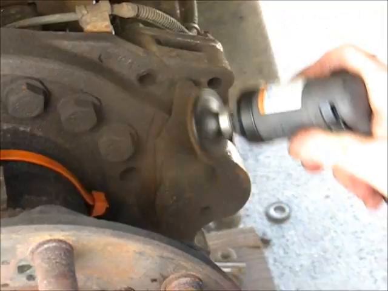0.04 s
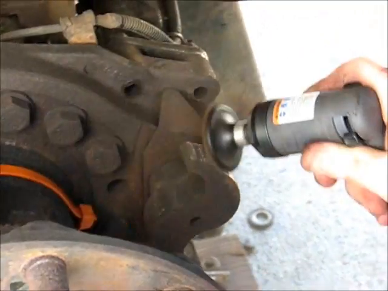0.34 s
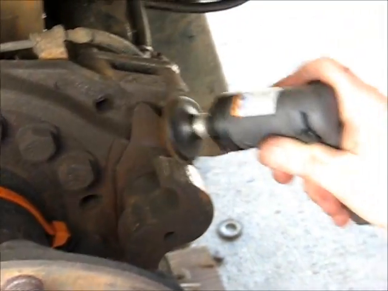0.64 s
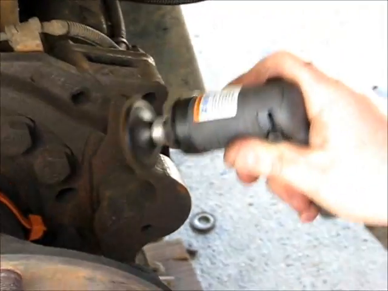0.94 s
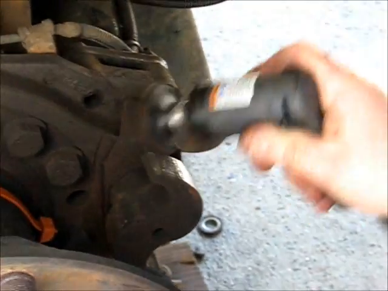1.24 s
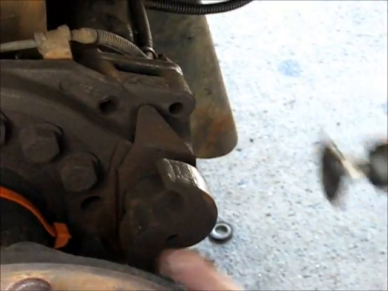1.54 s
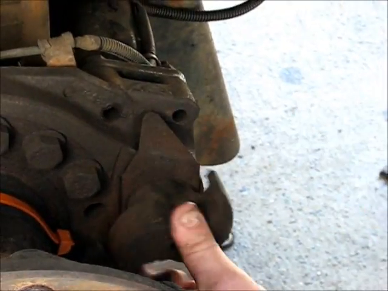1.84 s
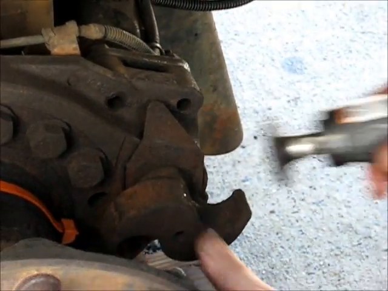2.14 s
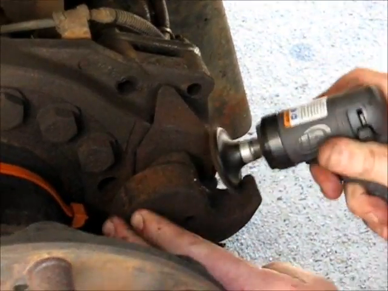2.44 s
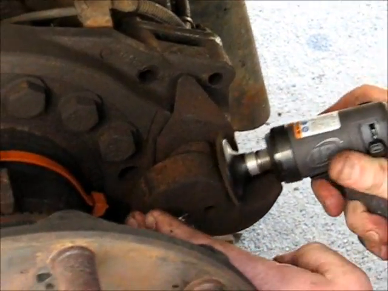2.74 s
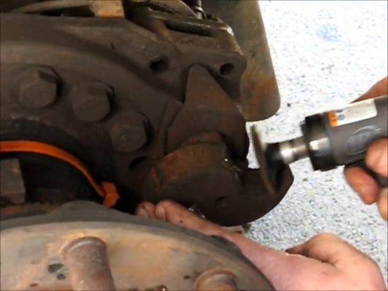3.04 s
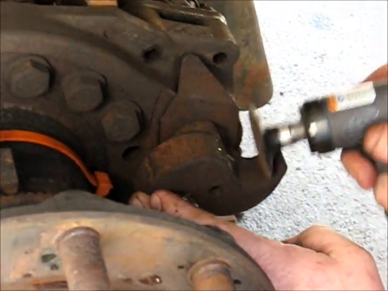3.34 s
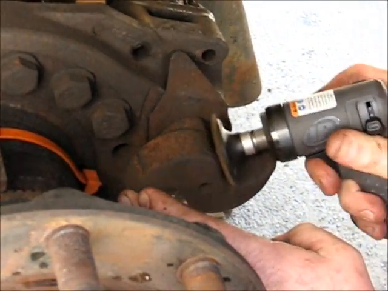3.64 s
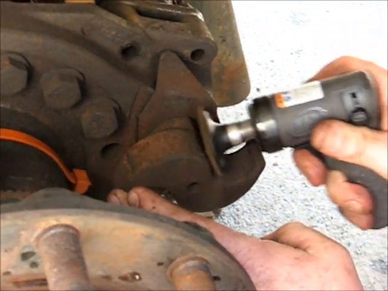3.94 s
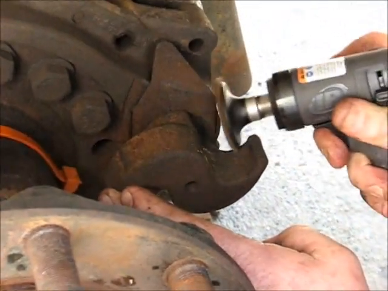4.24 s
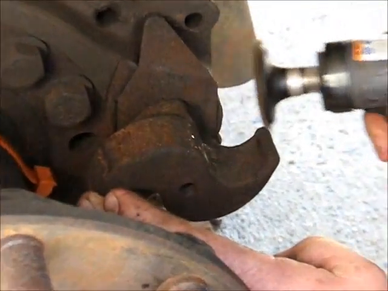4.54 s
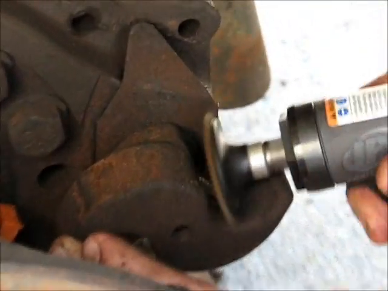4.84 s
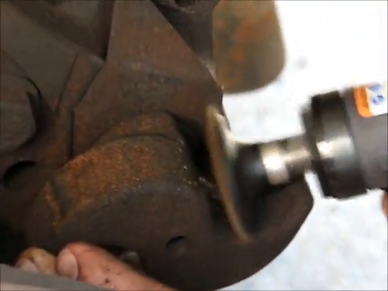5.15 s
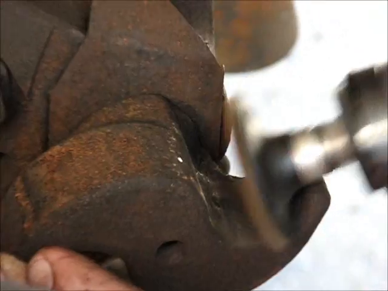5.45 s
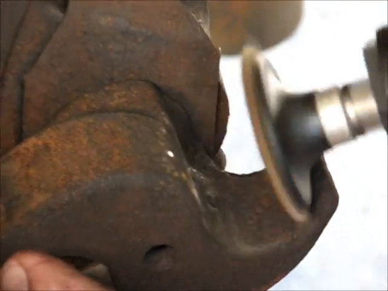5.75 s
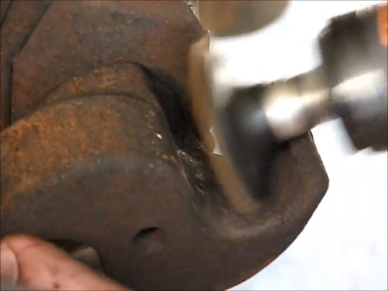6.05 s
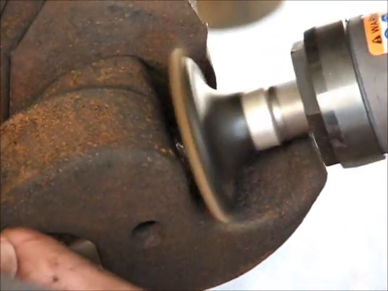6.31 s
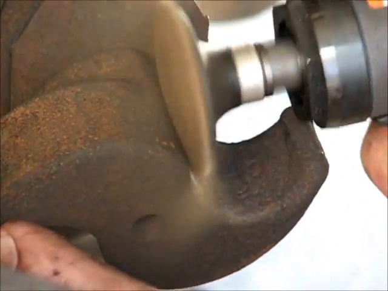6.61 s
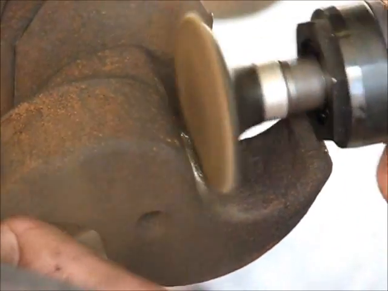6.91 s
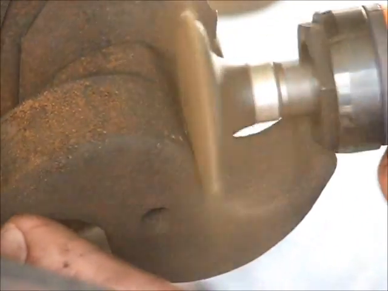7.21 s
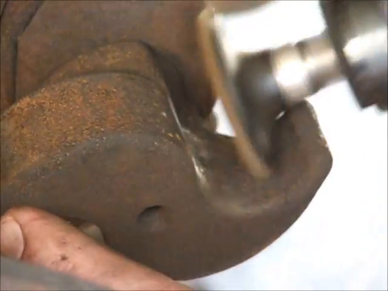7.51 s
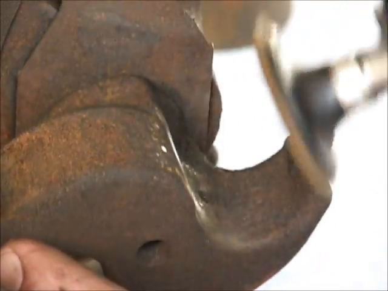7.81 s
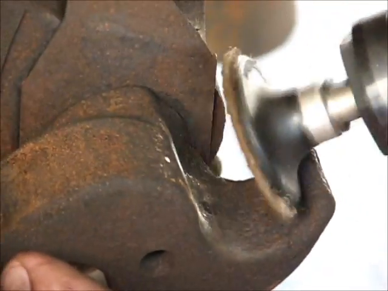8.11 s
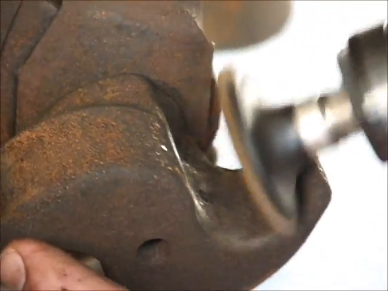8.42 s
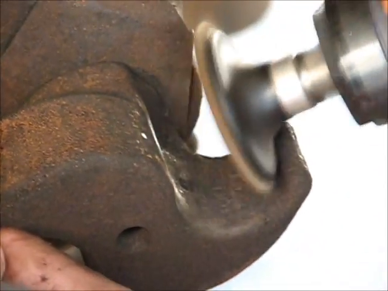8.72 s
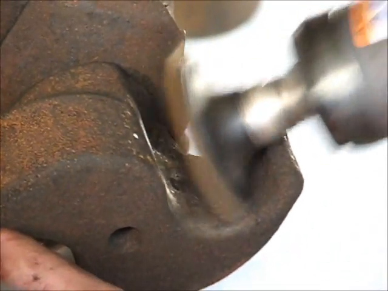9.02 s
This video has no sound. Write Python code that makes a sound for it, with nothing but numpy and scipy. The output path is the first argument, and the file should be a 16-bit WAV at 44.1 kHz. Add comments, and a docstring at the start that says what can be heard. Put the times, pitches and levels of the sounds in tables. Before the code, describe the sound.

A small air grinder is already running close to the microphone, its bright exhaust hiss over the scratchy buzz of an abrasive disc on rusty iron. At about 1.2 seconds it cuts out. In the quiet workshop pause come two soft clinking bumps, around 1.4 and 1.7 seconds, then a faint dry scrape and squeak as an iron part turns. A low puff of air hits the microphone, mostly on the right, and at 2.3 seconds the grinder spins up, biting an edge with loud chatter. It scrubs on in uneven strokes, the motor's hum dropping under pressure, with short knocks near 3, 4.2 and 5 seconds. A faint squeal comes around 4.5 seconds, and a breathy squeal with a brief whine around 7. After a sharp catch at 7.6 seconds the air sags briefly, then grinding continues until about 9 seconds.

```python
"""A small air grinder scrubs rust from an iron brake part, rests for a second, and starts again.
Exhaust air hisses and rings in the housing; the abrasive disc scratches and buzzes with each turn;
the vanes hum lower under load. During the rest a thumb pushes a dry iron cam round.
Nearby iron faces throw back shifting echoes; the exhaust buffets the right microphone port."""
import sys
import numpy as np
from scipy import signal
from scipy.fft import rfft, irfft, next_fast_len
from scipy.io import wavfile
from scipy.ndimage import uniform_filter1d, map_coordinates

SR = 44100
rng = np.random.default_rng(int(sys.argv[2]) if len(sys.argv) > 2 else 0)


def wav_out(sig):
    """Save sig, one row per channel (or a flat mono array), as 16-bit PCM at SR to the path in sys.argv[1]."""
    wavfile.write(sys.argv[1], SR, np.round(np.clip(np.atleast_2d(sig).T, -1, 1) * 32767).astype(np.int16))


N = 399987
TIME_S = np.arange(N) / SR

def amp(db):
    """Decibels to gain."""
    return 10 ** (np.asarray(db) / 20)

def unit(x):
    """Scale to rms 1."""
    return x / np.sqrt(np.mean(x ** 2) + 1e-20)

def along(points, hz):
    """Interpolate (Hz, value) points on a log axis."""
    f, v = np.transpose(points)
    return np.interp(np.log(hz + 1), np.log(f + 1), v)

def curves(rows, outside=None):
    """One value per sample for each column after the time."""
    s, *cols = np.transpose(rows)
    return np.array([np.interp(TIME_S, s, c, outside, outside) for c in cols])

def swells(rows):
    """Sum of bells from (middle s, length s at half height, height) rows."""
    t = np.linspace(0, N / SR, N // 64)
    bells = sum(height * np.exp2(-(2 * (t - s) / length) ** 2) for s, length, height in rows)
    return curves(np.transpose([t, bells]))[0]

def surges(rows):
    """Bells with heights in dB, as a gain."""
    return swells([(s, length, amp(db)) for s, length, db in rows])

def blows(rows, attack_s=0.00024):
    """Envelope of sharp blows from (start s, level dB, t60 s) rows."""
    t = np.arange(SR // 4) / SR
    envelope = np.zeros(N + SR)
    for s, db, t60 in rows:
        envelope[round(s * SR):][:len(t)] += (1 - np.exp(-t / attack_s)) * amp(db - 60 * t / t60)
    return envelope[:N]

def wobble(rate_hz):
    """Smooth random curve."""
    return map_coordinates(rng.standard_normal(int(N * rate_hz / SR) + 4), [TIME_S * rate_hz])

def noise():
    """Two unrelated white noises."""
    return rng.standard_normal((2, N))

def patchy(depth_db=2):
    """Noise whose colour drifts in patches."""
    spectra = signal.stft(noise(), nperseg=512)[2]
    field = uniform_filter1d(rng.standard_normal(spectra.shape[1:]), size=4, axis=0)
    field = uniform_filter1d(field, size=20, axis=1)
    return signal.istft(spectra * amp(depth_db * unit(field)), nperseg=512)[1][:, :N]

def breathy_tone(hz, width_hz):
    """Narrow noise at rms 1 around a steady or moving pitch."""
    phase = 2 * np.pi * np.cumsum(hz * np.ones(N)) / SR
    return unit(wobble(2 * width_hz) * np.cos(phase) + wobble(2 * width_hz) * np.sin(phase))

def filtered(x, response):
    """Apply a complex frequency response."""
    size = next_fast_len(N + SR // 4)
    return irfft(rfft(x, size) * response(np.fft.rfftfreq(size, 1 / SR)), size)[..., :N]

def coloured(x, spectrum):
    """Shape x by (Hz, dB) points, at rms 1."""
    return unit(filtered(x, lambda hz: amp(along(spectrum, hz))))

def resonate(x, modes):
    """Parallel (Hz, width Hz, dB) resonances of alternating sign."""
    return filtered(x, lambda f: sum(
        (-1) ** k * amp(db) * 1j * f * width / (hz * hz - f * f + 1j * f * width)
        for k, (hz, width, db) in enumerate(modes)))

def centred(x):
    """Mono as a mid/side pair."""
    return np.outer([1, 0], x)

# Background level. Each row: time in seconds, level in dB.
ROOM_LEVEL = [(1.3, -60.5), (1.6, -57.5), (1.95, -52), (2.32, -47)]
# Background spectrum. Each row: frequency in Hz, density in dB.
ROOM_SPECTRUM = [(100, 4.5), (500, 2.5), (900, 2), (1500, -2.5), (3000, -8), (6000, -9.5), (8300, -12),
                 (11000, -19), (15000, -28)]

def workshop(whistle_db=-19):
    """Soft background rush, and a thin whistle of air at the closed throttle."""
    level, = amp(curves(ROOM_LEVEL))
    resting, = amp(curves([(1.2, 0), (2.45, 0.0091)], outside=-np.inf))
    whistle = amp(whistle_db) * unit(resonate(noise(), [(8200, 50, 0)]))
    rush = coloured(noise(), ROOM_SPECTRUM)
    return level * (resting * whistle + (0.29 + resting) * rush)

# Stray air. Each row: middle in seconds, length in seconds, level in dB.
AIR_GUSTS = [(.27, .11, -43.5), (.95, .7, -45.5), (1.8, .65, -41.5), (2.24, .066, -29), (2.39, .088, -41.5),
             (2.86, .14, -47), (3.75, .55, -51), (6.03, .17, -56)]
# Wind rumble. Each row: frequency in Hz, density in dB.
WIND_SPECTRUM = [(15, -41), (25, -22), (54, -3), (135, -0.5), (289, -13.5), (403, -23), (498, -23),
                 (600, -28), (780, -39), (1320, -120)]

def draught(lumps_db=3, left_db=-11, right_db=3.5, still_db=-64):
    """Stray exhaust tumbles over the microphone ports, mostly the right one."""
    lumps = amp(lumps_db * wobble(40))
    level = surges(AIR_GUSTS) + amp(still_db + 3.3 * wobble(14))
    return level * amp([[left_db], [right_db]]) * coloured(noise() * lumps, WIND_SPECTRUM)

# Low modes of the casting. Each row: frequency in Hz, width in Hz, gain in dB.
CASTING_MODES = [(130, 140, -6.5), (294, 29, 10), (636, 100, 1.5)]

def casting(force):
    """The heavy casting booms when shaken."""
    return unit(resonate(force, CASTING_MODES))

# Hand bumps. Each row: start in seconds, clink in dB, thud in dB.
BUMPS = [(1.417, -55, -44), (1.710, -44, -47)]
# Thumb pushes. Each row: middle in seconds, length in seconds, level in dB.
CAM_PUSHES = [(1.785, 0.089, -45.5), (1.93, 0.087, -52.5), (2.135, 0.018, -51)]
# Modes of the clink and of the cam's scrape. Each row: frequency in Hz, width in Hz, gain in dB.
CLINK_MODES = [(3000, 400, 1), (4000, 250, 0), (4900, 170, 1), (7510, 140, -3), (9880, 180, -12)]
SCRAPE_MODES = [(3160, 370, -5.5), (5040, 500, -7), (6260, 130, 0), (6870, 120, -1), (7800, 200, -1),
                (9800, 100, -3), (10550, 120, -4), (11900, 220, -7)]
# Partials of the sticking cam. Each row: frequency in Hz, level in dB.
SQUEAK_PARTIALS = [(3080, -13), (4360, -9), (4950, -7), (6190, -1), (7410, -8), (9750, -9), (11800, -13)]

def handling(scrape_db=-1, grit_db=3, clink_t60_s=0.096, thud_t60_s=0.055):
    """The hand bumps the brake with a clink and a thud; the cam scrapes on its dry pin and squeaks."""
    clink = blows([(s, db, clink_t60_s) for s, db, _ in BUMPS]) * unit(resonate(noise(), CLINK_MODES))
    thump = blows([(s, db, thud_t60_s) for s, _, db in BUMPS]) * casting(noise())
    friction = noise() * amp(grit_db * wobble(1000))
    scrape = amp(scrape_db) * surges(CAM_PUSHES) * unit(resonate(friction, SCRAPE_MODES))
    partials = sum(amp(db) * breathy_tone(hz, width_hz=30) for hz, db in SQUEAK_PARTIALS)
    squeak = surges([(1.945, 0.086, -57)]) * partials
    return clink + thump + scrape + centred(squeak)

# Disc contacts. Each row: start in seconds, chatter in dB, thud in dB, chatter t60 in seconds.
CONTACTS = [(1.267, -32.5, -66, 0.04), (2.29, -38, -47, 0.071), (2.387, -19, -54, 0.078),
            (2.426, -19, -58, .05), (2.455, -13, -60, 0.069), (2.945, -28, -41, .08),
            (4.241, -20, -70, 0.061), (4.246, -18, -67, 0.047), (5.04, -24, -44, .08),
            (5.715, -38, -48, 0.049), (6.11, -34, -47, 0.051), (6.869, -36, -47, 0.062),
            (7.603, -13, -56, 0.05), (8.163, -37, -36.5, 0.068)]
# High modes of the iron. Each row: frequency in Hz, width in Hz, gain in dB.
IRON_MODES = [(1070, 410, -2), (1410, 250, 4.5), (2435, 1200, 7.5), (4080, 590, 11.5), (5000, 580, 13.5),
              (6100, 2000, 11), (7540, 650, 15.5), (9500, 2100, 4)]

def knocks(chatter_db=-3, thud_t60_s=0.13):
    """The disc catches an edge: a short chatter rings the iron and thumps the casting."""
    chatter = blows([(s, db + chatter_db, t60) for s, db, _, t60 in CONTACTS])
    thump = blows([(s, db, thud_t60_s) for s, _, db, _ in CONTACTS])
    return chatter * unit(resonate(noise(), IRON_MODES)) + thump * casting(noise())

# Tool squeals. Each row: middle and length in seconds, pitch and width in Hz, level in dB.
TOOL_SQUEALS = [(4.55, 0.3, 2443, 80.7, -42), (6.72, 0.24, 2162, 130.3, -47), (7.029, 0.62, 5140, 281, -34)]

def squeals():
    """Brief breathy squeals from the spinning tool as the disc rubs the iron."""
    arch = lambda s, length: np.cos(np.pi * np.clip((TIME_S - s) / length, -0.5, 0.5))
    return sum(amp(db) * arch(s, length) * breathy_tone(hz, width)
               for s, length, hz, width, db in TOOL_SQUEALS)

# Tool path. Each row: time in seconds, depth from 0 (top of the brake) to 1 (deep in the notch).
TOOL_DEPTH = [(0, 0.083), (1.2, 0.066), (2.5, 0.65), (3.2, 0.91), (4.5, 0.75), (5.3, 0.73), (6.2, 0.68),
              (6.7, 0.94), (7.3, 0.72), (7.7, 0.49), (8.3, 0.48), (9.07, 0.51)]
# Iron faces. Each row: delay in ms, delay added at full depth in ms, signed strength.
REFLECTIONS = [(1.2, 0.584, -0.0086), (1.46, 0.293, 0.013), (1.65, 0.87, -0.014), (3.22, -0.055, 0.0053),
               (3.42, -0.1, -0.002), (3.58, -0.597, -0.022), (3.98, -0.41, 0.0098), (4.52, 0.5, 0.0018),
               (4.72, -0.35, 0.021), (4.72, -0.083, 0.026), (4.95, -0.936, 0.032), (5.92, -0.048, -0.02),
               (6.23, -0.855, -0.021), (7.47, 0.87, -0.017), (7.52, 0.193, 0.034), (8.92, -0.32, -0.015),
               (10.86, -0.163, 0.031), (11.26, 0.16, 0.0011)]

def iron_echoes(x, depth):
    """Short echoes comb the sound; their delays slide as the tool moves."""
    n = np.arange(N)
    dull = filtered(x, lambda hz: amp(along([(1600, 17.5), (4000, 12), (9000, 0)], hz)))
    for delay_ms, slide_ms, strength in REFLECTIONS:
        when = n - (delay_ms + slide_ms * depth) * SR / 1000
        x = x + strength * np.array([np.interp(when, n, channel) for channel in dull])
    return x

# Hollows of the brake. Each row: frequency in Hz, width in Hz, gain in dB.
HOLLOW_MODES = [(429, 43, 8.5), (675, 43, 16.5), (1070, 82, 15.5), (923, 50, 6), (1480, 51, -4),
                (1650, 35, 4), (1947, 110, 14.5), (2160, 38, 12.5)]

def hollows(level_db=-7):
    """Scrubbing noise rings in the hollows of the brake."""
    return amp(level_db) * unit(resonate(noise(), HOLLOW_MODES))

def vane_hum(vane_phase, load, depth, level_db=-60.5, load_db=15, top_db=-7):
    """The vanes hum, and groan under load; ragged overtones flare in the hollows."""
    rough = 0.3 + 0.7 * load ** 2
    partials = 0
    for k, db in enumerate([0, -3, -8], 1):
        gain = amp(db + 3 * wobble(24)) / np.hypot(1, k * rough)
        tone = np.sin(k * (vane_phase + 0.6 * rough * wobble(90)))
        partials += gain * tone * (1 + k * rough * wobble(110))
    flare = sum(resonate(partials, [mode]) for mode in HOLLOW_MODES[:3])
    near_top = 1 - np.clip(2 * depth, 0, 1)
    return amp(level_db + load_db * load ** 2 + top_db * near_top) * (partials + 0.4 * flare)

def judder(load, level_db=-44):
    """Close to stalling, the disc grabs and shakes the casting."""
    return amp(level_db) * load ** 3 * casting(noise() * amp(1.9 * wobble(65)))

VANES = 4
# Disc whine. Each row: multiple of the turning rate, level in dB.
WHINE_ORDERS = [(16, -8), (22, -9), (28, 0), (31, 0), (32, -2), (35, -5), (36, -2), (38, -4), (41, -8),
                (49, -7)]

def disc_whine(vane_phase, middle_s=7.03, length_s=0.11, level_db=-29.5):
    """The skimming disc gives one brief, clear whine."""
    partials = sum(amp(db) * np.sin(k * vane_phase / VANES + 2 * np.pi * rng.random())
                   for k, db in WHINE_ORDERS)
    return surges([(middle_s, length_s, level_db)]) * unit(partials)

# Edge tones, lower then upper. Each row: mean pitch in Hz, width in Hz, level in dB.
SLOT_TONES = [(7565, 130, -9.5), (12130, 97, -16)]
# Slots turning to the iron. Each row: time in seconds, nominal upper pitch in Hz, gain of both in dB.
SLOT_TRACK = [(1.2, 12190, -7), (2.55, 12500, -1), (3.1, 12200, -3.5), (3.3, 11780, -1), (3.65, 11830, -5),
              (3.9, 12200, -2), (4.15, 12300, 0), (4.5, 12230, -7), (4.9, 12280, 5), (5.2, 12080, -1),
              (5.55, 12240, -4), (5.8, 12430, 2.5), (6, 11970, -6), (6.15, 12130, -1), (6.4, 11950, -4),
              (6.6, 12490, 0), (7.1, 12040, -12), (7.35, 11990, -6), (8.3, 12200, -1), (8.6, 12260, -5)]

def slot_whistles(wander=0.0037, flicker_db=2):
    """Two breathy edge tones at the exhaust slots; the upper bends as the tool turns."""
    upper_hz, level_db = curves(SLOT_TRACK)
    tones = 0
    for (hz, width, db), bend in zip(SLOT_TONES, [1, upper_hz / np.mean(upper_hz)]):
        gain = amp(db + flicker_db * wobble(12))
        tones += gain * breathy_tone(hz * bend * (1 + wander * wobble(14)), width)
    return amp(level_db) * tones

def grain_buzz(x, vane_phase, load, free_share=0.42, grains=256):
    """The same grains come round every turn, so part of x becomes a buzz, most under light load."""
    position = vane_phase / (2 * np.pi * VANES) % 1 * grains
    track = lambda: map_coordinates(rng.standard_normal(grains), [position], mode="grid-wrap")
    drift = wobble(7)
    share = free_share * (1 - load) ** 2
    buzz = np.array([np.cos(drift) * track() + np.sin(drift) * track() for _ in range(2)])
    return np.sqrt(1 - share) * unit(x) + np.sqrt(share) * unit(buzz)

# Disc angle. Each row: time in seconds, flatness from 0 (on edge) to 1 (flat on the iron).
DISC_FLATNESS = [(0, 0.74), (1.3, 0.65), (3.3, 0.06), (6.2, 0.08), (6.65, 0.8), (7.1, 0.73), (7.3, 0.84),
                 (7.45, 0.18)]
# Exhaust chamber, outlet, ring under the disc. Each row: frequency in Hz, width in Hz, gain in dB.
CHAMBER_MODES = [(2530, 170, -21), (2920, 330, 5), (3353, 140, -2.5)]
OUTLET_MODES = [(3134, 500, 0)]
FACE_MODES = [(1395, 95, -6.5), (2335, 260, 2.5), (2860, 450, -2), (3533, 72, 8), (4390, 390, 2)]

def tool_ring(vane_phase, load, flutter, housing_db=-2.5, face_db=-2):
    """Exhaust rings in the housing; a ring under the disc takes over as it lies flat."""
    flat = np.clip(curves(DISC_FLATNESS)[0], 0, 1)
    housing_gain = amp(housing_db + 0.81 * wobble(9)) * np.sqrt(1 - flat)
    housing = unit(resonate(resonate(noise() * flutter, CHAMBER_MODES), OUTLET_MODES))
    face = unit(resonate(grain_buzz(noise(), vane_phase, load), FACE_MODES))
    return housing_gain * housing + amp(face_db) * np.sqrt(flat) * face

# Disc on rust. Each row: frequency in Hz, density in dB.
SCRATCH_SPECTRUM = [(60, -19), (150, -27), (280, -12.5), (350, -10), (500, -4), (850, -1), (1250, -6),
                    (1900, 3.5), (2400, -5), (3500, 3), (8000, -47)]

def disc_scratch(vane_phase, load, grit, flutter, level_db=-2):
    """Abrasive grains scratch the rust."""
    scratch = grain_buzz(noise() * grit, vane_phase, load) * flutter
    return amp(level_db) * coloured(scratch, SCRATCH_SPECTRUM)

# Air jet and its top fizz. Each row: frequency in Hz, density in dB.
JET_SPECTRUM = [(600, -41.5), (1600, -18.5), (2300, -11.5), (3700, -10), (4400, -9), (4800, -5.5),
                (5300, -3), (6500, -2), (7200, -2.5), (7600, -5.5), (8100, -4.5), (8900, -9.5),
                (10500, -31), (15000, -51)]
FIZZ_SPECTRUM = [(6000, -35), (8500, -7.5), (9500, -1.5), (10500, 0), (11400, -1), (12100, 0),
                 (12600, -3.5), (13100, -10), (14200, -8.5), (15200, -16), (15700, -28)]

def exhaust_hiss(vane_phase, load, grit, flutter, brightness, jet_db=-1, fizz_db=-6):
    """The exhaust jet hisses, with a high fizz scaled by brightness."""
    jet = coloured(grain_buzz(patchy() * grit, vane_phase, load) * flutter, JET_SPECTRUM)
    fizz = coloured(patchy() * flutter * grit, FIZZ_SPECTRUM)
    return amp(jet_db) * jet + amp(fizz_db) * brightness * fizz

# The finger slackens on the throttle. Each row: middle in seconds, length in seconds, air in dB.
THROTTLE_EASES = [(7.905, 0.11, -6), (8.045, 0.092, -14), (8.115, .05, -11)]

def air_motor(load, free_vane_hz=661, shut_s=1.188, reopen_s=2.296, open_s=0.22, spin_up_s=0.16):
    """Air gain and vane rate: the throttle shuts and reopens; load and eased air slow the shaft."""
    ease_db = swells(THROTTLE_EASES)
    since_s = TIME_S - reopen_s
    bleed = amp(-347 * np.maximum(TIME_S - shut_s, 0))  # 347 dB/s
    opening = np.clip(since_s / open_s, 0, 1) ** 1.07
    spun_up = 1 - 0.85 * (since_s > 0) * np.exp(-abs(since_s) / spin_up_s)  # restarts from 15%
    air = (bleed + opening) * amp(ease_db)
    vane_hz = free_vane_hz * spun_up * (1 - load) * amp(0.55 * ease_db)
    return air, vane_hz

# Hand strokes. Each row: middle in seconds, length in seconds, share of the stalling load.
STROKES = [(.2, .37, 0.22), (.77, 0.29, 0.16), (1.14, .2, 0.13), (2.43, 0.15, 0.49), (2.857, .27, .68),
           (3.146, 0.17, 0.19), (3.349, 0.072, 0.18), (3.467, 0.38, 0.2), (3.808, 0.21, 0.21),
           (3.963, .09, 0.21), (4.223, 0.35, 0.41), (4.47, 0.14, .18), (4.795, .11, .38), (4.92, .16, 0.52),
           (5.05, .11, 0.51), (5.187, .12, 0.33), (5.371, 0.15, 0.36), (5.525, 0.11, 0.31),
           (5.714, .11, 0.43), (5.895, 0.16, 0.37), (6.113, 0.1, .56), (6.284, .16, .27),
           (6.481, 0.26, 0.16), (6.775, .15, .19), (7.22, .11, .17), (7.48, .17, 0.38), (7.61, .14, 0.58),
           (8.25, .22, 0.16), (8.43, 0.1, 0.3), (8.57, .1, 0.32), (8.685, .1, 0.29), (8.815, 0.12, 0.37),
           (9.01, 0.17, 0.51)]
# The disc bites an edge (+) or skims (-). Each row: middle and length in seconds, contact in dB.
DISC_BITES = [(.14, 0.093, 2), (.42, 0.21, 1), (.6, 0.065, -1.5), (2.405, 0.14, 12.5), (2.51, 0.061, -9),
              (2.95, 0.095, 4), (3.3, 0.99, 1.5), (4.55, 0.6, -2.5), (4.83, 0.25, -2.5), (5.3, .1, 1.5),
              (7.44, 0.06, 2), (7.63, 0.034, -4.5), (7.7, 0.19, -2.5), (7.92, 0.1, -5), (8.125, .05, 4),
              (8.175, 0.079, 3), (8.33, .15, 0), (8.49, 0.11, -2.5), (8.72, 0.16, 2.5), (8.98, 0.092, 1.5)]

def grinder(exhaust_db=-24.5, ring_db=-34.5, scrub_db=-46.5, grit_db=1.34):
    """The hand leans the disc on the iron: the shaft slows and the contact grows louder."""
    load = np.clip(swells(STROKES), 0, 0.8)
    bite_db = swells(DISC_BITES)
    depth, = curves(TOOL_DEPTH)
    air, vane_hz = air_motor(load)
    exhaust_gain = air * amp(exhaust_db + 0.47 * bite_db)
    ring_gain = air ** 0.62 * amp(ring_db + 2 * load + bite_db)
    scrub_gain = air ** 0.62 * amp(scrub_db + 5.5 * load + 0.84 * bite_db)
    jitter = (0.0005 + 0.018 * load) * wobble(90)
    vane_phase = 2 * np.pi * np.cumsum(vane_hz * (1 + jitter)) / SR
    skips = amp(0.4 * wobble(14) + 0.53 * wobble(110))  # the disc skips over the rust
    flutter = skips * (1 + 0.043 * np.cos(vane_phase))
    grit = amp(grit_db * wobble(3000))  # single grains bite and let go
    brightness = (vane_hz / np.mean(vane_hz)) ** 0.78  # a faster motor passes more air
    hiss = exhaust_gain * exhaust_hiss(vane_phase, load, grit, flutter, brightness)
    ring = ring_gain * tool_ring(vane_phase, load, flutter)
    scratch = scrub_gain * disc_scratch(vane_phase, load, grit, flutter)
    hollow_ring = scrub_gain * hollows()
    hum = unit(exhaust_gain) * vane_hum(vane_phase, load, depth)
    tones = hum + disc_whine(vane_phase) + exhaust_gain * brightness * slot_whistles()
    return iron_echoes(hiss + ring + scratch, depth) + hollow_ring + judder(load) + centred(tones)

# Port likeness. Each row: frequency in Hz, left-right likeness from 0 to 1.
PORT_LIKENESS = [(100, 1), (400, 1), (1300, 0.92), (2000, 0.83), (3300, 0.33), (4500, 0.91), (5700, 1),
                 (7500, 0.84), (9000, 0.73), (12000, 0.65), (15000, 1)]
# Port colour. Each row: frequency in Hz, left minus right in dB.
PORT_BALANCE = [(300, 0), (1500, -0.5), (2400, -3), (3100, -4.5), (4000, 0), (6200, -0.5), (6900, 1),
                (7600, -12.5), (8400, -16.5), (9700, 10), (11000, -5), (12200, 14.5), (13200, -3.5),
                (15000, 8)]
# Port phase. Each row: frequency in Hz, left lead in radians.
PORT_LEAD = [(1800, 0.043), (3010, 0.31), (3450, 1), (4300, 0.79), (6300, -0.68), (7410, -0.64),
             (8500, 0.72), (9800, -0.26), (11500, 0.86), (12200, 0)]

def microphone(mid_side):
    """Two ports share much of the sound, and each has its own resonances."""
    def spread(hz):
        angle = np.arccos(np.clip(along(PORT_LIKENESS, hz), 0, 1)) / 2
        return np.array([np.ones_like(hz), np.tan(angle)])

    def ports(hz):
        left_share = 1 / (1 + amp(-along(PORT_BALANCE, hz)))
        phase = np.exp(np.outer([0.5j, -0.5j], along(PORT_LEAD, hz)))
        return 2 * phase * np.array([left_share, 1 - left_share])

    mid, side = filtered(mid_side, spread)
    return filtered(np.array([mid + side, mid - side]), ports)

def scene():
    """The tool and the iron close to the microphone."""
    return microphone(grinder() + centred(squeals()) + knocks() + handling() + workshop()) + draught()

def record(dry):
    """Brick-wall low-pass at 15.5 kHz."""
    return filtered(dry, lambda hz: hz < 15500)

dry = scene()
out = record(dry)
wav_out(out)
```